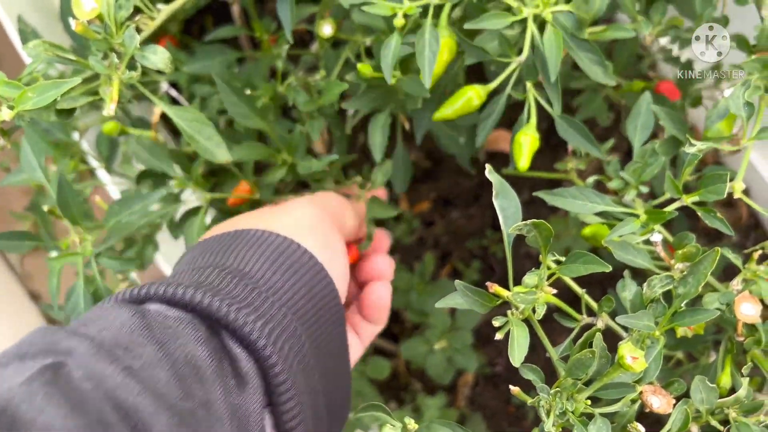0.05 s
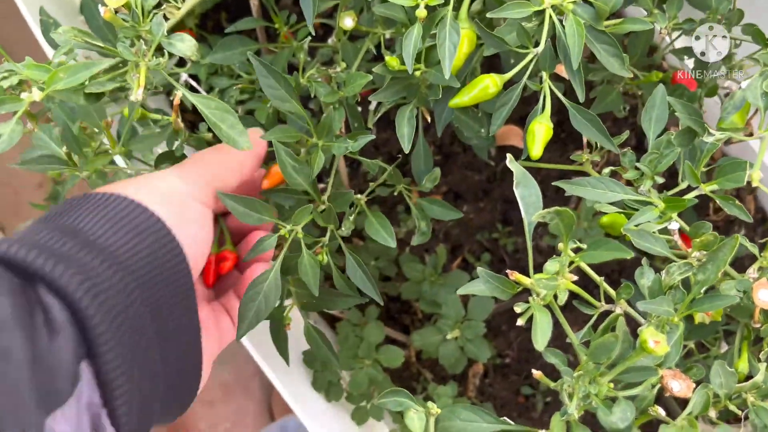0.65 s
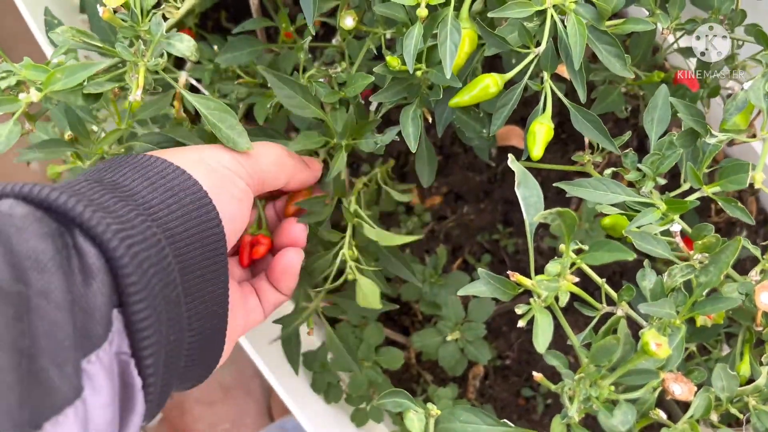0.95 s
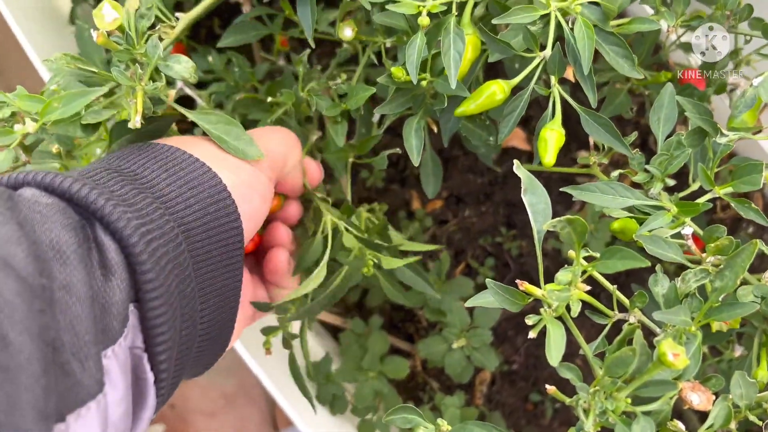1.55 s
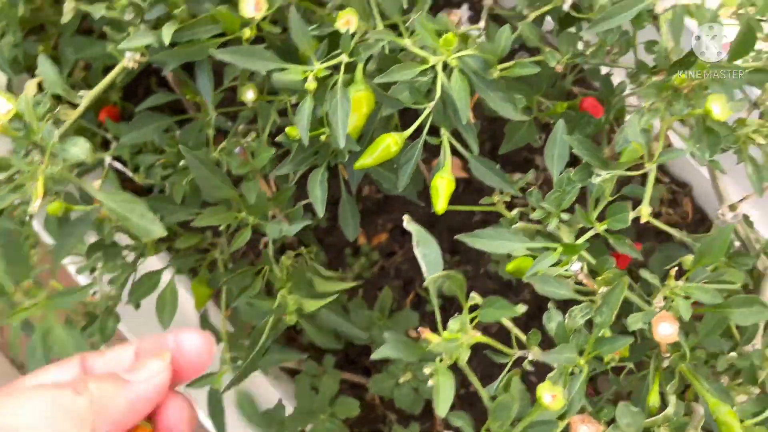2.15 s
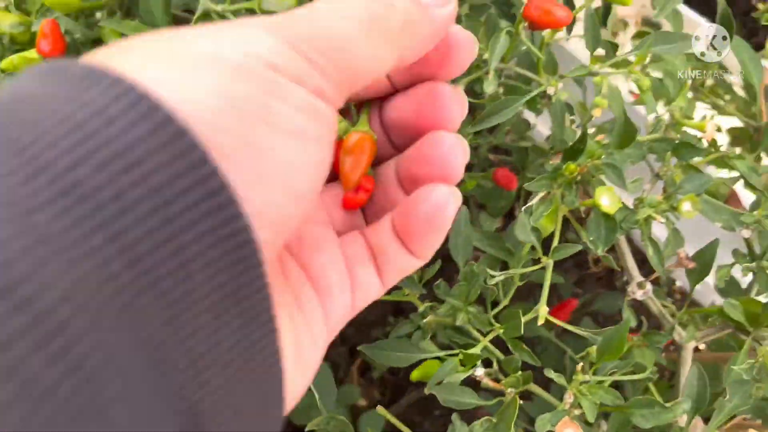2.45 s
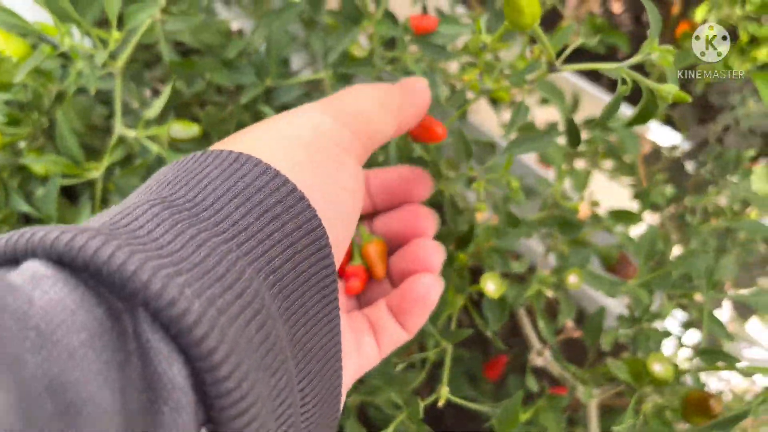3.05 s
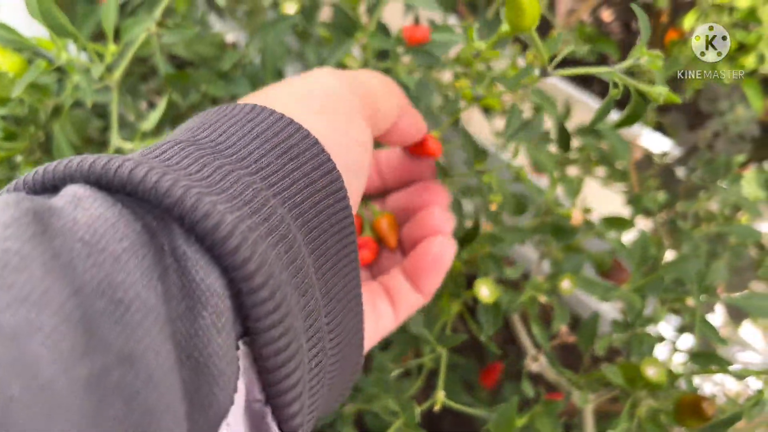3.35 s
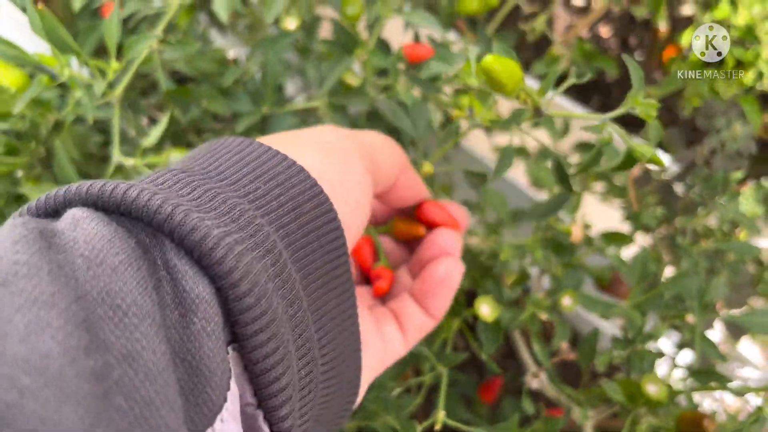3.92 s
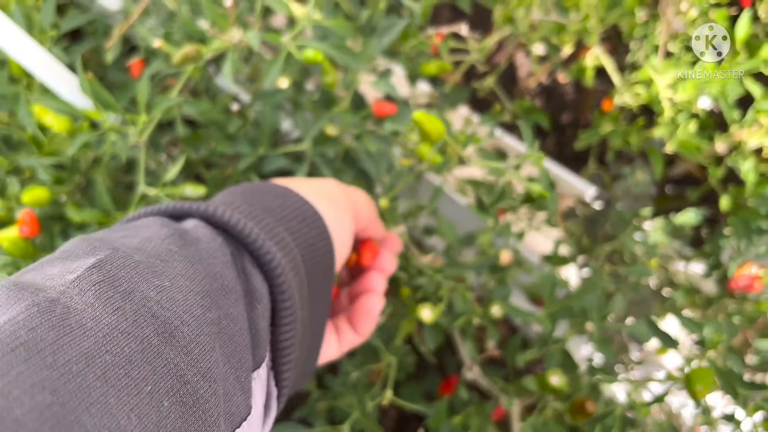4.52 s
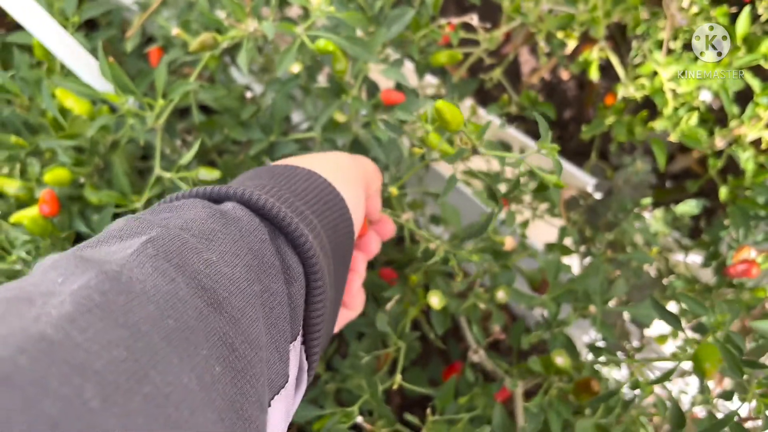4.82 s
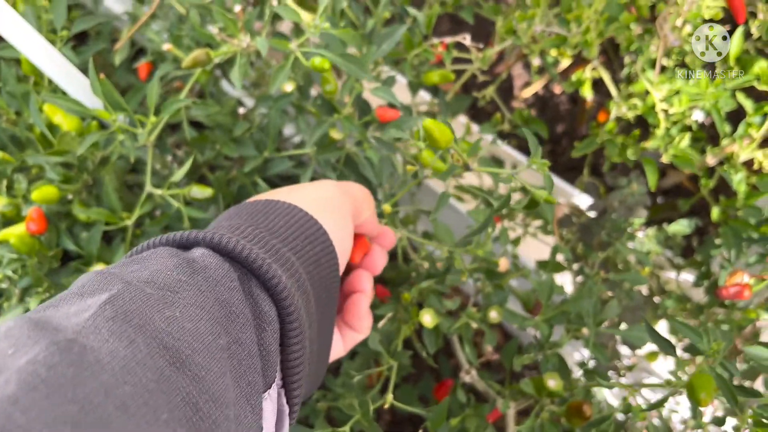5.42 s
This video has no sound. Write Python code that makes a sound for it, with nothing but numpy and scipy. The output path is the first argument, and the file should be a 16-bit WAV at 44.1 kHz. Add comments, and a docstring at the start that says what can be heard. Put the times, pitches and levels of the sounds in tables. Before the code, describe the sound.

Leaves rustle softly and one stalk snaps as peppers are picked, over low wind rumble, a distant engine and faint birds.

```python
"""First comes an uneven rumble of wind and the wash of far traffic, with a low drone on top.
The drone, most likely a vehicle's engine some way off, climbs, changes gear and climbs again.
Close by, peppers are picked from potted plants: leaves rustle as they slide over the hand and
tick as they flick off it, and one stalk snaps. Small birds call now and then, echoing off walls."""
import sys
import numpy as np
from scipy import signal
from scipy.fft import rfft, irfft, next_fast_len
from scipy.io import wavfile
from scipy.ndimage import uniform_filter1d, map_coordinates

SR = 44100
rng = np.random.default_rng(int(sys.argv[2]) if len(sys.argv) > 2 else 0)


def int16_out(signal):
    """Quantize to a 16-bit WAV file."""
    q = np.round(np.clip(np.atleast_2d(signal).T, -1, 1) * 32767)
    wavfile.write(sys.argv[1], SR, q.astype(np.int16))


N = 246078

# The tone colour of each noise. Each row: frequency in Hz, relative strength in dB.
WIND_COLOUR = [(12, -23), (22, -16.5), (31, -18), (40, 2.5), (52, 8), (75, 7.5), (100, -0.5), (125, -0.5),
               (170, -6.5), (260, -13.5), (500, -67.5)]
TRAFFIC_COLOUR = [(90, -26.5), (150, -4), (230, -13), (290, -3.5), (345, -10), (450, -7), (640, -10),
                  (800, -11), (1200, -14), (1580, -18.5), (1900, -22.5), (2800, -26), (3600, -43),
                  (4700, -64.5), (8000, -120)]
TYRE_COLOUR = [(250, -32), (550, -8.5), (800, 9), (1050, 0), (1500, -10.5), (2500, -54.5)]
HISS_COLOUR = [(2000, -8.5), (3200, 5), (4200, -1), (5500, -4), (6800, -9.5), (8000, -18.5), (9700, -18),
               (10800, -33.5), (15000, -49)]
LEAF_COLOUR = [(1000, -20), (3000, -1), (6000, 0.5), (8500, -3.5), (11000, -1), (13500, -2), (15000, -13.5)]
CRACKLE_COLOUR = [(2000, -24), (6000, -5), (10000, -1), (13000, -1.5), (15000, -10.5)]
SLEEVE_COLOUR = [(1200, -15), (2500, 5), (4500, 6), (7000, -0.5), (9500, -5), (11500, -16), (14500, -29.5)]
LEAF_EDGE_COLOUR = [(3000, -25), (7000, -9), (10000, -1), (13200, 0), (14400, -4), (15500, -14)]
# How alike noise is at the two ears. Each row: frequency in Hz, likeness (1 or more is identical).
EAR_LIKENESS = [(45, 3.5), (85, 5.5), (140, 0.5), (280, 1.4), (600, 0.5), (1500, 0), (4000, 0.51),
                (8000, -0.1)]
# Which ear hears the background louder. Each row: frequency in Hz, left minus right in dB.
FAR_BALANCE = [(35, -0.5), (85, -1.2), (170, -2.5), (330, 0), (680, 5), (1400, -0.2), (2800, 0),
               (5500, 4.5), (9000, -2)]
# The wind, with a lull partway through. Each row: time in seconds, level in dB.
WIND_STRENGTH = [(0, -30), (1.4, -32), (1.85, -34), (3.3, -32.5), (4.3, -32), (5.58, -33)]
# Nearer cars. Each row: time when closest in seconds, level then in dB, seconds to drop 3 dB.
CAR_PASSES = [(2.55, -44, 0.6), (3.59, -39, 0.11), (4.95, -48.5, 3.1)]
# Far machinery. Each row: pitch in Hz, peak level in dB, peak time in seconds, seconds to drop 3 dB.
MACHINE_HUMS = [(38.1, -33.5, 0.7, 0.73), (51.65, -32, 5.4, 1.6), (99.9, -34, 4.74, 3.7),
                (148.8, -49.5, 2.6, 1.3), (276.7, -50.5, 1.6, 1.3), (491.4, -51, 1.2, 2.9),
                (2960, -71.5, 3.1, 2.5)]
# A fainter engine pulls away. Each row: time in seconds, firing rate in Hz, level in dB.
FAR_ENGINE_RUN = [(0.9, 122.2, -70), (1.5, 143.7, -45), (2.1, 149.6, -52), (2.55, 161, -47),
                  (2.75, 165.8, -36), (3.1, 173.8, -47.5), (3.6, 181, -66.5)]
# The main engine climbs, changes gear, climbs and eases. Each row: time in seconds, firing rate in Hz.
ENGINE_FIRING = [(0.15, 68.5), (.5, 78.2), (0.78, 80.4), (0.9, 89.44), (1.05, 94.7), (1.33, 105.7),
                 (1.55, 104.2), (1.62, 86.4), (1.74, 75), (2.17, 75.43), (2.3, 80.77), (2.75, 80.73),
                 (3.22, 86), (3.55, 91.74), (4.05, 94.6), (4.3, 99.25), (4.9, 102.4), (5.11, 110.3),
                 (5.26, 110.1), (5.45, 88.27), (5.58, 79.85)]
# Its drone fades in and out on the wind. Each row: time in seconds, level in dB before DRONE_DB.
ENGINE_FADES = [(0.0, -32), (0.19, -26), (0.26, -39), (0.53, -19), (0.76, -28), (0.79, -20.5),
                (1.07, -23.5), (1.12, -38.5), (1.21, -38), (1.31, -21.5), (1.35, -41), (1.39, -26),
                (1.52, -31.5), (1.62, -18), (1.67, -37.5), (1.72, -27), (1.89, -23.5), (2.04, -25),
                (2.19, -18.5), (2.25, -27.5), (2.46, -19.5), (2.62, -22.5), (2.66, -38.5), (2.73, -23.5),
                (3.22, -19), (3.26, -30.5), (3.6, -26.5), (3.64, -19), (4.12, -30.5), (4.2, -22.5),
                (4.4, -19.5), (4.58, -44), (4.76, -25), (4.8, -33), (4.89, -20.5), (4.94, -36), (5.33, -38),
                (5.39, -17), (5.435, -27), (5.46, -15), (5.53, -17), (5.58, -18)]
# Its higher tones. Each row: multiple of the firing rate, level in dB against the lowest tone.
ENGINE_OVERTONES = [(2, -25.5), (3, -37)]
# A bird's falling calls. Each row: start and length in seconds, end pitch in Hz,
# relative level in dB, rasp as a share of the pitch.
FALLING_CALLS = [(.908, .13, 3800, -58, .036), (3.652, .085, 3850, -53.5, .036),
                 (5.317, .145, 3980, -58.5, .024)]
# Its short peeps. Each row: start and length in seconds, pitch in Hz, relative level in dB.
BIRD_PEEPS = [(.27, 0.043, 3150, -64), (1.152, .033, 4340, -57), (1.203, 0.038, 3334, -55),
              (1.8, .035, 3830, -60), (4.023, 0.023, 6210, -56.5), (4.54, .06, 4990, -63),
              (5.47, .06, 7037, -67), (5.52, .045, 4880, -60)]
# The hand moves through the plants. Each row: peak time, rise and fall in seconds,
# leaf level in dB, sleeve level in dB.
HAND_STROKES = [(.27, 0.37, .13, -82, -64.5), (.6, 0.093, .5, -80.5, -81), (1.43, .25, .5, -75.5, -69.5),
                (1.645, 0.026, 0.046, -65, -57), (1.815, 0.056, .13, -68, -58.5),
                (2.0, 0.3, 0.94, -76.5, -60), (2.5, 0.27, .3, -85, -63.5), (3.14, .12, 0.13, -89, -67.5),
                (4.08, 0.27, .2, -92, -71.5)]
# One leaf brushes the fingers. Each row: peak time, rise and fall in seconds, level in dB.
LEAF_BRUSHES = [(.055, .02, .03, -76), (.325, .02, .02, -77), (.878, .04, .03, -77),
                (1.825, .045, .04, -64), (3.387, .035, .018, -69), (3.868, .03, .02, -69.5),
                (4.665, .03, .015, -79)]
# Leaves flick off the hand. Each row: start in seconds, level in dB, ringing pitch in Hz.
LEAF_TICKS = [(.255, -58, 6800), (1.4618, -48.5, 12300), (1.551, -59, 13400), (1.7797, -38.5, 7350),
              (1.8282, -47.5, 9600), (2.073, -50.5, 13200), (2.216, -51.5, 9600), (4.649, -61, 9200),
              (4.949, -65, 9000)]
# The stalk's tone colour. Each row: frequency in Hz, relative dB at the left ear, then at the right.
STALK_COLOUR = [(600, -22, -22), (1700, -8, -9), (2550, 5, 0), (3500, -11, -15), (4100, -7, -14),
                (4700, -15, -12), (5800, -9, -3), (6350, -12, -8), (7200, -12, 0), (8600, -11, -14),
                (10400, -11, -5), (12500, -14, -13), (14500, -9, -8), (16000, -18, -16)]
# The stalk's crack, tear and recoil. Each row: start in seconds, level in dB,
# added brightness in dB per octave, seconds to fade by 60 dB.
SNAP_STAGES = [(1.6297, -22.5, -.5, .006), (1.6305, -35.5, 6, .022), (1.6343, -31.5, -10, .016)]

GUST_DB, GUSTS_PER_S, LUMP_DB, LUMPS_PER_S = 0.66, 3.2, 1, 9  # the wind's slow and quick wavering
DRONE_DB, FLUTTER_DB, FLUTTERS_PER_S = -0.78, 1.9, 20  # the engine's gain and its fast fading
THIN_FIRST_S, THIN_EVERY_S, THIN_COUNT = 4.16, .357, 4  # the farther bird's repeated note
ECHO_FADE_S, TICK_FADE_S = .36, .005  # time to fade by 60 dB
STIR_DB = -97.5  # leaves stirring between strokes
CATCHES_PER_S, CRACKLE_DB = 300, -3  # leaf edges catching on skin; level against the sliding
FAR_LAG_S, NEAR_LAG_S = .00044, -.000175  # how long the right ear trails the left
TOP_HZ = 15100


def amp(db):
    """Turns decibels into a gain to multiply by."""
    return 10 ** (np.asarray(db) / 20)


def unit(x):
    """Scales a signal to an average power of 1."""
    return x / np.sqrt(np.mean(x ** 2) + 1e-20)


def along(points, hz):
    """Reads between a table's (Hz, value) rows on a logarithmic frequency scale."""
    freqs, values = np.transpose(points)
    return np.interp(np.log(hz + 1), np.log(freqs + 1), values)


def curves(rows):
    """Gives one value per sample for each column after the time."""
    times, *columns = np.transpose(rows)
    return [np.interp(np.arange(N) / SR, times, column) for column in columns]


def wobble(rate):
    """A smooth curve through `rate` random values a second."""
    return map_coordinates(rng.standard_normal(int(N * rate / SR) + 4), [np.arange(N) * rate / SR])


def filtered(x, response):
    """Multiplies each frequency in x by response(hz)."""
    size = next_fast_len(N + SR // 2)
    return irfft(rfft(x, size) * response(np.fft.rfftfreq(size, 1 / SR)), size)[..., :N]


def add(track, start_s, sound):
    """Mixes a sound into the track."""
    room = track[max(round(start_s * SR), 0):][:len(sound)]
    room += sound[:len(room)]


def from_side(x, lag_s):
    """Sound from one side reaches the right ear lag_s after the left (earlier if negative)."""
    return filtered(x, lambda hz: np.exp(-2j * np.pi * hz * lag_s * np.array([[-.5], [.5]])))


def rush(colour, patchy_db):
    """Stereo noise in a tone colour, with random louder and softer patches in time and pitch."""
    slices = signal.stft(rng.standard_normal((2, N)), nperseg=1024)[2]
    patches = uniform_filter1d(rng.standard_normal(slices.shape[1:]), size=7, axis=0)
    patches = uniform_filter1d(patches, size=9, axis=1)
    pair = signal.istft(slices * amp(patchy_db * unit(patches)), nperseg=1024)[1][:, :N]

    def share(hz):
        angle = np.arccos(np.clip(along(EAR_LIKENESS, hz), -1, 1)) / 2
        return amp(along(colour, hz)) * [np.cos(angle), np.sin(angle)]
    mid, side = filtered(pair, share)
    return unit(np.array([mid + side, mid - side]))


def wind():
    """Wind rumbles in slow gusts and quicker lumps."""
    db = curves(WIND_STRENGTH)[0] + GUST_DB * wobble(GUSTS_PER_S) + LUMP_DB * wobble(LUMPS_PER_S)
    return amp(db) * rush(WIND_COLOUR, patchy_db=1.0)


def passing(nearest_s, db, half_power_s):
    """The gain of something going by on a straight road: twice as far, half as strong."""
    return amp(db) / np.hypot(1, (np.arange(N) / SR - nearest_s) / half_power_s)


def traffic():
    """Far traffic makes a broad wash, and the tyres of nearer cars swell as they pass."""
    wash_gain = passing(nearest_s=3.02, db=-38, half_power_s=3.27) * amp(0.41 * wobble(9.5))
    wash = wash_gain * rush(TRAFFIC_COLOUR, patchy_db=1.0)
    car_gain = np.sqrt(sum(passing(*car) ** 2 for car in CAR_PASSES))
    tyres = car_gain * amp(1.2 * wobble(8)) * rush(TYRE_COLOUR, patchy_db=1.5)
    return wash + tyres


def hiss():
    """A thin, steady hiss lies behind everything."""
    return amp(-58.5) * rush(HISS_COLOUR, patchy_db=1.9)


def hums():
    """Far machines hum faintly; each tone wavers and swells once."""
    t = np.arange(N) / SR
    out = np.zeros(N)
    for hz, db, peak_s, spread_s in MACHINE_HUMS:
        gain = amp(db - 3 * ((t - peak_s) / spread_s) ** 2 + 2.4 * wobble(4))
        out += gain * np.sin(2 * np.pi * hz * t + 0.74 * wobble(8.2))
    return out


def far_engine():
    """A more distant exhaust is heard as one wavering tone."""
    hz, db = curves(FAR_ENGINE_RUN)
    gain = amp(db + 3.1 * wobble(9))
    return gain * np.sin(2 * np.pi * np.cumsum(hz * (1 + 0.012 * wobble(12))) / SR)


def engine():
    """From afar only the exhaust's lowest tones arrive, fading in and out on the wind."""
    (firing_hz,), (db,) = curves(ENGINE_FIRING), curves(ENGINE_FADES)
    phase = 2 * np.pi * np.cumsum(firing_hz * (1 + 0.0075 * wobble(14))) / SR
    overtones = sum(amp(level + 0.97 * wobble(4.2)) * np.sin(multiple * phase)
                    for multiple, level in ENGINE_OVERTONES)
    gain = amp(db + DRONE_DB + FLUTTER_DB * wobble(FLUTTERS_PER_S))
    return np.sqrt(2) * gain * (np.sin(phase) + overtones)


def bird_note(length_s, start_hz, end_hz, db, rasp):
    """One note starts abruptly, slides quickly to its end pitch and holds it."""
    progress = np.linspace(0, 1, int(length_s * SR))
    hz = end_hz + (start_hz - end_hz) * np.exp(-7 * progress)
    hz *= 1 + rasp * (wobble(600) + 0.97 * wobble(90))[:len(hz)]  # a fast rasp on a slower quiver
    shape = np.abs(np.sin(np.pi * progress)) ** .35
    return amp(db) * shape * np.sin(2 * np.pi * np.cumsum(hz) / SR)


def birds():
    """One bird calls and peeps, a farther one repeats a thin note, and walls echo both."""
    calls = np.zeros(N)
    for start_s, length_s, end_hz, db, rasp in FALLING_CALLS:
        add(calls, start_s, bird_note(length_s, start_hz=5630, end_hz=end_hz, db=db, rasp=rasp))
    for start_s, length_s, hz, db in BIRD_PEEPS:
        add(calls, start_s, bird_note(length_s, hz, hz, db, rasp=0.026))
    for k in range(THIN_COUNT):
        thin = bird_note(length_s=.07, start_hz=6580, end_hz=6580, db=-68.5 + rng.normal(), rasp=.012)
        add(calls, THIN_FIRST_S + k * THIN_EVERY_S, thin)
    t = np.arange(SR // 3) / SR
    walls = unit(rng.standard_normal((2, len(t))) * amp(-60 * t / ECHO_FADE_S)) / np.sqrt(len(t))
    echo = signal.fftconvolve(calls[None], walls, axes=1)[:, :N]
    return .75 * calls + 1.45 * echo


def swell(peak_s, rise_s, fall_s, db):
    """The gain of one hand movement: up 13 dB over the rise, down 13 dB over the fall."""
    t = np.arange(N) / SR
    return amp(db - 13 * np.maximum((peak_s - t) / rise_s, (t - peak_s) / fall_s))


def rustle():
    """Leaves slide over skin and crackle as they catch; the sleeve rubs with a duller hush."""
    leaf_gain, sleeve_gain = amp(STIR_DB), 0
    for *timing, leaf_db, sleeve_db in HAND_STROKES:
        leaf_gain = np.hypot(leaf_gain, swell(*timing, leaf_db))
        sleeve_gain = np.hypot(sleeve_gain, swell(*timing, sleeve_db))
    grain = unit(amp(3.3 * wobble(450) + 2.6 * wobble(30)))
    weave = unit(amp(2.5 * wobble(200)))
    catches = (rng.random(N) < CATCHES_PER_S / SR) * rng.standard_normal(N)
    crackle = amp(CRACKLE_DB) * unit(filtered(catches, lambda hz: amp(along(CRACKLE_COLOUR, hz))))
    sliding = grain * rush(LEAF_COLOUR, patchy_db=4.5)
    rubbing = weave * rush(SLEEVE_COLOUR, patchy_db=0.5)
    return leaf_gain * (sliding + crackle) + sleeve_gain * rubbing


def brushes():
    """A single leaf edge scrapes over the fingers in a brief, bright, grainy wisp."""
    grains = amp(3.5 * wobble(700)) * rng.standard_normal(N)
    scrape = unit(filtered(grains, lambda hz: amp(along(LEAF_EDGE_COLOUR, hz))))
    return sum(swell(*brush) for brush in LEAF_BRUSHES) * scrape


def fibres(colour, db, fade_s, tilt_db=0):
    """Tearing fibres make a burst of noise; tilt_db per octave makes it brighter or duller."""
    t = np.arange(SR // 8) / SR
    hz = np.fft.rfftfreq(len(t), 1 / SR)
    strengths = amp(along(colour, hz) + tilt_db * np.log2(np.maximum(hz, 1500) / 6000))
    decay = amp(db - 60 * t / fade_s)
    # Phases taken from a fading noise keep the burst bunched at its start.
    scatter = np.exp(1j * np.angle(rfft(decay ** .7 * rng.standard_normal(len(t)))))
    burst = irfft(strengths * scatter, len(t)) * decay ** .3
    return burst * np.linalg.norm(decay) / np.linalg.norm(burst)


def ticks():
    """Leaves flick off the hand with a short ring and a tiny crack, a little to the right."""
    out = np.zeros(N)
    t = np.arange(SR // 50) / SR
    for start_s, db, hz in LEAF_TICKS:
        ring = amp(db - 60 * t / TICK_FADE_S) * np.sin(2 * np.pi * hz * t)
        add(out, start_s, ring)
        add(out, start_s, fibres(LEAF_EDGE_COLOUR, db - 2, TICK_FADE_S))
    return out * amp([[-.8], [.8]])


def snap():
    """The stalk breaks beside the hand: woody at the left ear, sharper at the right."""
    out = np.zeros((2, N))
    hz, *ears = np.transpose(STALK_COLOUR)
    for track, ear_db in zip(out, ears):
        colour = np.column_stack([hz, ear_db])
        for start_s, db, tilt_db, fade_s in SNAP_STAGES:
            add(track, start_s, fibres(colour, db, fade_s, tilt_db))
    return out


def scene():
    """The street and birds lie to the left; the plants are close and slightly to the right."""
    far = wind() + traffic() + hiss() + engine() + far_engine() + hums() + birds()
    far = filtered(far, lambda hz: amp(along(FAR_BALANCE, hz) * np.array([[.5], [-.5]])))
    near = rustle() + brushes() + ticks() + snap()
    return from_side(far, FAR_LAG_S) + from_side(near, NEAR_LAG_S)


def record(dry):
    """Cuts the treble steeply above TOP_HZ."""
    return filtered(dry, lambda hz: 1 / np.sqrt(1 + (hz / TOP_HZ) ** 90))


dry = scene()
out = record(dry)
int16_out(out)
```